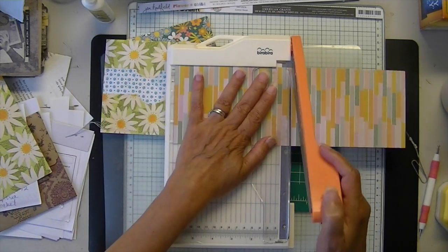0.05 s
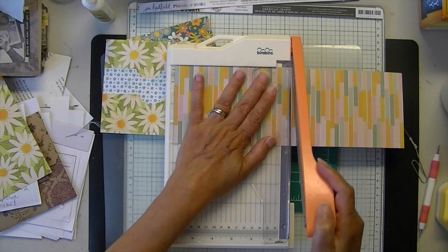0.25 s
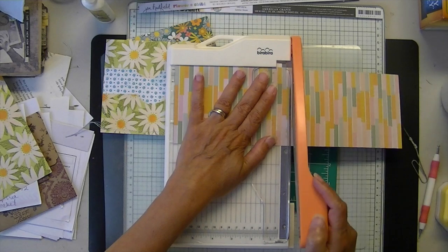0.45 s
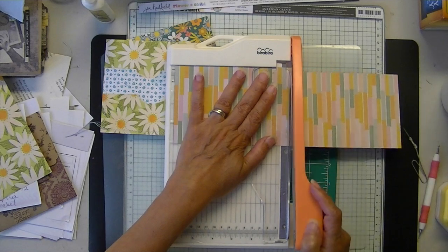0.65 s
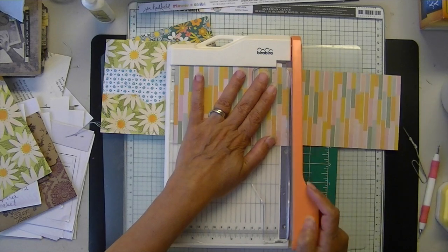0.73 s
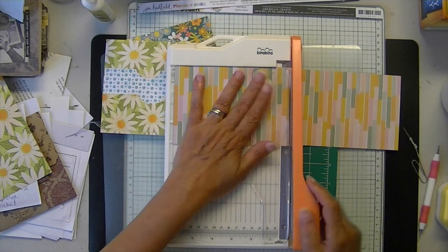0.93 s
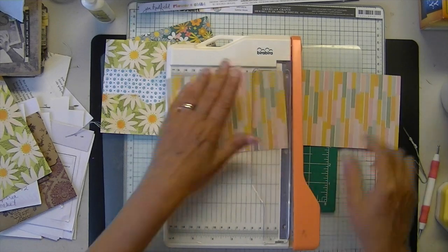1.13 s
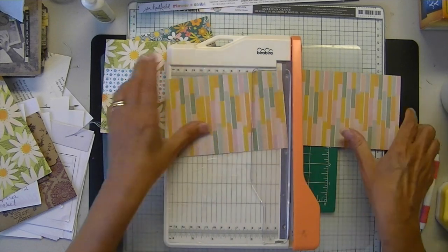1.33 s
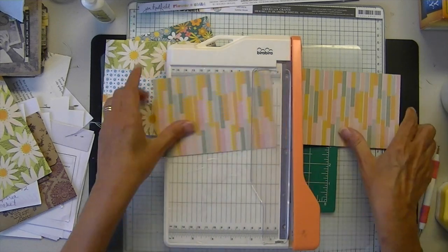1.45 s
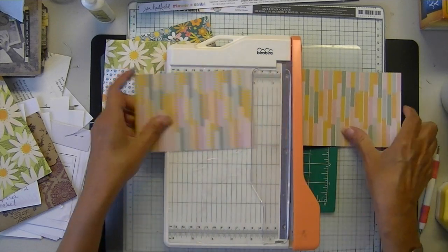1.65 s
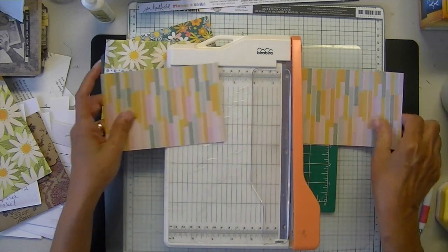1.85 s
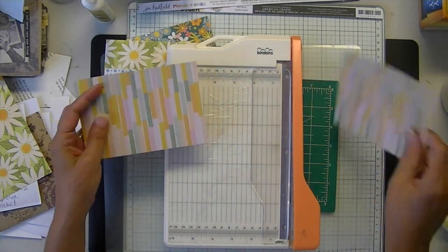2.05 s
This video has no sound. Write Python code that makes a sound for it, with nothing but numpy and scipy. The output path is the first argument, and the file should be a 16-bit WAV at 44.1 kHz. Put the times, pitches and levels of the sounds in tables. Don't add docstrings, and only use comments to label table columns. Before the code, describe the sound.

Close up on an indoor craft table, a cutter blade grinds through stiff paper for under a second, seats with a short scrape, then hands drag both pieces off the plastic base with crisp snaps and knocks.

```python
import sys
import numpy as np
from scipy import signal
from scipy.fft import rfft, irfft, next_fast_len
from scipy.io import wavfile
from scipy.ndimage import uniform_filter1d, map_coordinates

SR = 44100
rng = np.random.default_rng(int(sys.argv[2]) if len(sys.argv) > 2 else 0)


def gain_from_db(level_db):
    decades = np.asarray(level_db, float) / 20
    return 10 ** decades


def wav_out(sig):
    wavfile.write(sys.argv[1], SR, np.round(np.clip(np.atleast_2d(sig).T, -1, 1) * 32767).astype(np.int16))


N = 92610

# pitch_hz, width_hz, level_db
ARM_MODES = [
    [(711, 16, 1), (1148, 39, -10.5), (1916, 167, -7), (2105, 32, 3), (3291, 65, -0.5), (4435, 77, -12.5),
     (5950, 80, -13), (7600, 420, -21.5), (10300, 350, -21)],
    [(745.6, 18, 9.5), (1223, 41, -1.5), (1939, 58, 5), (3130, 15, 3), (6800, 100, -5.5),
     (7590, 200, -13.5), (8960, 150, -11), (10510, 220, -15.5)],
    [(690, 82, 7), (1350, 48, 7), (1630, 110, 3.5), (2320, 98, 4), (3978, 63, 1), (4735, 110, -0.5),
     (8200, 180, -4.5), (8760, 190, -12.5), (10400, 790, -14)],
    [(757, 48, 3.5), (1239, 200, 5), (2263, 150, 3.5), (3280, 140, 0), (5720, 27, -13.5)],
]
# pitch_hz, level_db (per Hz)
BASE_COLOUR = [(59, -85), (100, -53), (294, -19), (705, -4.5), (1310, -8), (2550, -8), (2920, -14.5),
               (6000, -12), (7800, -19), (13200, -120)]


def unit(x):
    return x / np.sqrt(np.mean(x ** 2) + 1e-20)


def along(points, hz):
    f, value = np.transpose(points)
    return np.interp(np.log(hz + 1), np.log(f + 1), value)


def curves(rows):
    s, level_db, *others = np.transpose(rows)
    t = np.arange(N) / SR
    return [np.interp(t, s, level_db, -120, -120)] + [np.interp(t, s, c) for c in others]


def wobble(rate):
    knots = rng.standard_normal(int(N * rate / SR) + 4)
    return map_coordinates(knots, [np.arange(N) * rate / SR])


def filtered(x, response):
    m = next_fast_len(N + SR // 2)
    return irfft(rfft(x, m) * response(np.fft.rfftfreq(m, 1 / SR)), m)[..., :N]


def colour(points):
    return lambda hz: gain_from_db(along(points, hz))


def rings(modes):
    return lambda f: sum(gain_from_db(db) * 1j * f * w / (c * c - f * f + 1j * f * w) for c, w, db in modes)


def sides(pan_db):
    return gain_from_db(np.array([pan_db / 2, -pan_db / 2]))


def grains(response, spread_db, clump_db, patchy_db):
    # pitch_hz, likeness (0 to 1)
    likeness = [(250, .97), (1000, .92), (4000, .78), (15000, .66)]
    tears_per_s, tear_db = 680, 5
    clumps = wobble(300) + 0.51 * wobble(50.4)
    tears = rng.random(N) < tears_per_s / SR
    size = gain_from_db(spread_db * rng.standard_normal(N) + clump_db * clumps + tear_db * tears)
    spectrum = signal.stft(size * rng.standard_normal((2, N)), nperseg=512)[2]

    patches = uniform_filter1d(rng.standard_normal(spectrum.shape[1:]), size=2, axis=0)
    patches = unit(uniform_filter1d(patches, size=12, axis=1))
    pair = signal.istft(spectrum * gain_from_db(patchy_db * patches), nperseg=512)[1][:, :N]

    def mid_side(hz):
        turn = np.arccos(np.clip(along(likeness, hz), -1, 1)) / 2
        return response(hz) * [np.cos(turn), np.sin(turn)]

    mid, side = filtered(pair, mid_side)
    return unit(np.array([mid + side, mid - side]))


def gated_hush():
    # pitch_hz, level_db (per Hz)
    air_colour = [(100, -31.5), (700, 3.5), (3300, -1), (16000, -27.5)]
    air = grains(colour(air_colour), 0.1, 0.43, 4.3)
    hum = grains(rings(ARM_MODES[0]), 0.1, 3.0, 1.5)
    return gain_from_db(-70) * (air + gain_from_db(-1.0) * hum)


def room(x):
    t60_s, shared = 0.095, 0.52
    t = np.arange(SR // 4) / SR
    draw = rng.standard_normal((3, len(t)))
    tail = (draw[:2] + shared * draw[2]) * gain_from_db(-60 * t / t60_s) * (t > 0.003)
    return signal.fftconvolve(x, tail / np.linalg.norm(tail[0]), axes=1)[:, :N]


def paper_ticks():
    # start_s, peak_db, pitch_hz, t60_s
    tick_events = [(0.8008, -12.5, 7140, 0.034), (0.8259, -12, 5570, 0.039), (0.8801, -13, 4320, .04),
                   (0.9137, -12, 7370, 0.021), (0.9175, -26.5, 11800, .04), (0.9192, -15, 3430, 0.03),
                   (0.948, -15.5, 7550, .02), (0.959, -29.5, 11800, 0.043), (0.96, -24.5, 4200, 0.047),
                   (0.998, -16, 7600, .035), (0.9985, -25, 11640, 0.055), (1, -20, 3500, 0.025),
                   (1.037, -24, 7170, 0.017), (1.0424, -32, 7540, .015), (1.053, -25, 10750, 0.017),
                   (1.059, -19, 3700, 0.022), (1.0835, -15, 9550, 0.018), (1.0882, -21, 4560, 0.021),
                   (1.102, -18, 1870, .05), (1.108, -24, 8800, 0.0096), (1.3063, -34.5, 6230, .03),
                   (1.4135, -25, 5940, 0.016), (1.4202, -13.5, 6800, .015), (1.4197, -14, 3250, 0.031),
                   (1.4259, -12, 5360, 0.017), (1.468, -15, 5000, 0.0066), (1.487, -10.5, 7420, 0.012),
                   (1.492, -14, 9600, 0.018), (1.4973, -10, 2540, 0.028), (1.509, -9.5, 3270, 0.027),
                   (1.523, -17, 3300, 0.055), (1.568, -13.5, 2030, .015), (1.5824, -16.5, 6040, .008),
                   (1.6884, -29.5, 4040, 0.017), (1.7067, -23, 1740, .04), (1.756, -13.5, 2230, .03),
                   (1.756, -18, 5200, 0.022), (1.765, -16.5, 1900, 0.055), (1.764, -21, 5200, 0.016),
                   (1.863, -16, 1880, 0.025), (1.9171, -21, 2280, 0.023), (1.9581, -26.5, 7260, 0.076),
                   (1.99, -27, 3370, 0.043), (1.988, -29, 7600, 0.095), (2.0654, -45, 2500, .03),
                   (2.07, -26, 10700, 0.054), (1.012, -22, 316, 0.016), (1.102, -37, 286, 0.021),
                   (1.424, -22, 282, 0.021), (1.515, -27.5, 294, .03)]
    snap_t60_s, fizz_db, widening_s, shared = 0.0015, 5, 0.0045, 0.65
    out = np.zeros((2, N + SR))
    t = np.arange(SR // 8) / SR
    for start_s, peak_db, hz, t60_s in tick_events:
        draw = rng.standard_normal((3, len(t)))
        noise = shared * draw[2] + np.sqrt(1 - shared ** 2) * draw[:2]
        fizz = gain_from_db(fizz_db - 60 * t / t60_s) * noise
        snap = gain_from_db(-60 * t / snap_t60_s) * np.sign(draw[2]) * 2
        span = 1 + widening_s / t60_s
        band = signal.butter(2, [hz / span, min(hz * span, SR / 3)], "band", fs=SR, output="sos")
        tick = signal.sosfilt(band, fizz + snap)
        out[:, round(start_s * SR):][:, :len(t)] += gain_from_db(peak_db) * tick / abs(tick).max()
    return out[:, :N]


def base_taps():
    # start_s, peak_db, low_mode_hz, softness_db
    tap_events = [(0.98, -19.5, 723, 13), (1.016, -23, 637, 23), (1.059, -11.5, 926, 3),
                  (1.156, -15, 540, 14), (1.288, -44.5, 590, 32), (1.363, -18.5, 813, -4.5),
                  (1.423, -20.5, 474, 4), (1.521, -13.5, 520, 1), (1.762, -18.5, 733, 9),
                  (1.989, -37, 1120, 15), (2.093, -22.5, 910, 23)]
    # pitch_hz, level_db, t60_s
    shell_modes = [(2080, 0, .045), (3350, -5, .03), (1900, -7, .05), (1400, -15, .04)]
    # start_s, left_minus_right_db
    tap_pan = [(1.6, 3.5), (1.75, -6)]
    low_t60_s, rise_s, puff_db, puff_t60_s = 0.021, 0.0011, -16.5, 0.048
    soft_tilt = 0.54
    floor_hz = 200

    out = np.zeros((2, N + SR))
    t = np.arange(SR // 4) / SR
    puff = grains(colour(BASE_COLOUR), 0.61, 0.87, 10.0)
    for start_s, peak_db, low_hz, soft_db in tap_events:
        start = round(start_s * SR)
        modes = [(low_hz, soft_db, low_t60_s), (low_hz * 1.1, soft_db - 22.5, low_t60_s * 2)]
        for hz, db, t60_s in shell_modes:
            modes.append((hz, db - soft_tilt * max(soft_db, 0) * np.log2(hz / 1800), t60_s))
        knock = 0
        for hz, db, t60_s in modes:
            envelope = gain_from_db(db + rng.normal(0, 1.5) - 60 * t / t60_s)
            knock = knock + envelope * np.sin(2 * np.pi * hz * rng.normal(1, 0.01) * t)
        air = gain_from_db(puff_db - 60 * t / puff_t60_s) * puff[:, start // 2:][:, :len(t)]
        tap = (knock + air) * (1 - np.exp(-t / rise_s))
        pan_db = np.interp(start_s, *np.transpose(tap_pan))
        out[:, start:][:, :len(t)] += gain_from_db(peak_db) * sides(pan_db)[:, None] * tap / abs(tap).max()
    return filtered(out[:, :N], lambda f: (1j * f / (1j * f + floor_hz)) ** 2)


def sheet_slides():
    # start_s, speed_db, base_weight_db
    strokes = [
        [(1.04, -48, 6), (1.08, -44.5, 10), (1.11, -24.5, -1.5), (1.126, -63, -9), (1.15, -40.5, 0),
         (1.17, -55, -1), (1.225, -40.5, -17), (1.26, -73.5, -12.5), (1.285, -85, -6.5)],
        [(1.3, -76, -19.5), (1.307, -38.5, -27), (1.35, -44.5, -43), (1.41, -43, -12)],
        [(1.411, -48, 6), (1.421, -33.5, 6), (1.45, -40.5, 10), (1.487, -36.5, 7), (1.493, -25, 0.5),
         (1.525, -33.5, 10.5), (1.58, -44.5, 5.5), (1.64, -48, -3.5), (1.678, -96, 0)],
        [(1.68, -54, 0.5), (1.71, -38, 6.5), (1.75, -33, 1), (1.762, -32.5, 8.5), (1.8, -35.5, 0.5)],
        [(1.8, -34, 0), (1.835, -27.5, 3.5), (1.875, -36.5, 4), (1.93, -50.5, 11), (1.986, -48.5, 1),
         (1.992, -41.5, 9), (2.05, -57, 4), (2.072, -36.5, 2.5), (2.1, -39.5, 4)],
    ]
    stroke_pan = [-0.54, .6, 0.91, -0.48, -1.7]
    # pitch_hz, level_db (per Hz)
    sheet_colour = [(180, -51), (300, -32), (762, 0), (1100, -29), (5430, -18), (9880, 8), (16000, -8.5)]
    # pitch_hz, level_db (per Hz)
    lifted_colour = [(200, -92), (1070, -11), (1200, -9.5), (1890, -9), (2200, 0.5), (2900, -12),
                     (6800, -10.5), (7500, -10), (8400, -14), (12000, -59.5)]
    sheet = grains(colour(sheet_colour), 3.5, 0.8, 1.8)
    base = grains(colour(BASE_COLOUR), 4, 1.1, 4)
    lifted = grains(colour(lifted_colour), 4.5, 0.8, 3)
    out = 0
    for rows, pan_db, under in zip(strokes, stroke_pan, [base] * 4 + [lifted]):
        speed_db, weight_db = curves(rows)
        out = out + gain_from_db(speed_db) * sides(pan_db)[:, None] * (sheet + gain_from_db(weight_db) * under)
    return out


def arm_ringing():
    # start_s, place (along the arm; 4 = at rest)
    travel = [(.31, 0), (.42, 1), (.5, 1), (.57, 2), (.74, 2), (.8, 3), (.95, 3), (1.03, 4)]
    s, place = np.transpose(travel)
    place = np.interp(np.arange(N) / SR, s, place)
    ring = 0
    for k, modes in enumerate(ARM_MODES + ARM_MODES[:1]):
        share = np.sqrt(np.clip(1 - abs(place - k), 0, 1))
        ring = ring + share * grains(rings(modes), 3.5, 0.8, 1.5)
    return ring


def blade():
    # start_s, force_db
    cut = [(.094, -72), (.1, -32), (.19, -26), (.22, -20), (.34, -23), (.46, -14), (.52, -16), (.67, -11.5),
           (.79, -23)]
    # start_s, force_db
    seat = [(.76, -44), (.81, -21), (.83, -17), (.845, -24), (.865, -27), (.885, -19), (.9, -29.5),
            (.915, -28)]
    # start_s, force_db
    settle = [(.895, -32), (.922, -23.5), (.94, -27), (.99, -30.5), (1.03, -28), (1.06, -42), (1.2, -59.5),
              (1.25, -69)]
    # pitch_hz, level_db (per Hz)
    fibre_colour = [(59, -81), (100, -49), (736, -6.5), (854, -5.5), (1720, 2.5), (6290, -14.5),
                    (9020, -11), (16000, -39.5)]
    # pitch_hz, level_db (per Hz)
    edge_colour = [(3000, -26.5), (4500, 3.5), (11500, -3.5), (13000, -21.5), (16000, -32.5)]
    # pitch_hz, width_hz, level_db
    groan_modes = [(224, 39, -9.5), (429, 106, 3.5), (600, 150, 0), (1115, 150, -7)]
    # pitch_hz, left_minus_right_db
    lean = [(200, 2.5), (1000, 0.8), (4000, -1)]
    fibre_db, edge_db, groan_db, ring_db = -1, -12, -8.5, -3
    fibre_grows, edge_grows, groan_grows = 1.35, 1, 2.08

    ring = arm_ringing()
    fibres = grains(colour(fibre_colour), 3.5, 1.2, 3.5)
    groan = grains(rings(groan_modes), 3.5, 1.2, 3.5)
    edge = grains(colour(edge_colour), 3, 0.9, 4)
    card = gain_from_db(np.interp(np.arange(N) / SR, (0.17, 0.26), (-9, 0)))
    out = 0
    for rows, shear_db, load_db in ((cut, 0.1, 0.1), (seat, 0.2, -10), (settle, -14, -9)):
        force_db, = curves(rows)
        top = force_db.max()
        below = force_db - top
        shear = gain_from_db(top + fibre_grows * below + fibre_db + shear_db) * fibres
        scrape = gain_from_db(top + edge_grows * below + edge_db + shear_db) * (force_db > -100) * edge
        load = gain_from_db(top + groan_grows * below + groan_db + load_db) * groan
        out = out + card * (shear + scrape + load) + gain_from_db(force_db + ring_db) * ring
    return filtered(out, lambda hz: sides(along(lean, hz)))


def scene():
    near = paper_ticks() + base_taps() + sheet_slides() + blade()
    return gated_hush() + gain_from_db(-5.5) * room(near) + near


def band_limit(x):
    return signal.sosfilt(signal.butter(12, 16340, fs=SR, output="sos"), x)


def record(dry):
    def microphone(hz):
        bass_cut = (1j * hz / (1j * hz + 150)) ** 4
        return bass_cut * np.where(hz < 15850, 1, 0.03) * (hz < 16300)

    x = filtered(dry, microphone)
    x = x / (1 + abs(x) ** 16) ** (1 / 16)
    return band_limit(x)


dry = scene()
out = record(dry)
wav_out(out)
```